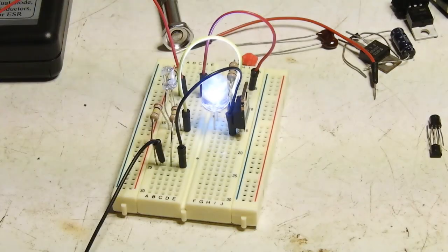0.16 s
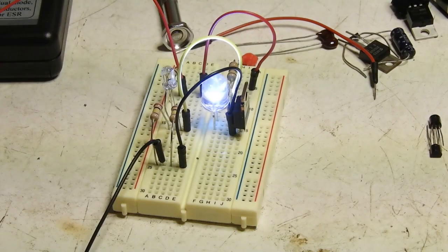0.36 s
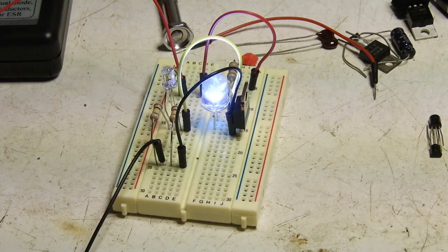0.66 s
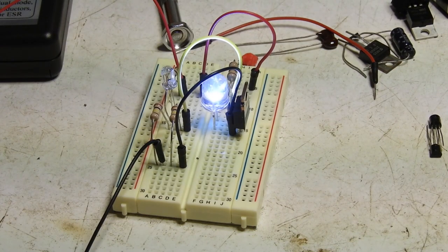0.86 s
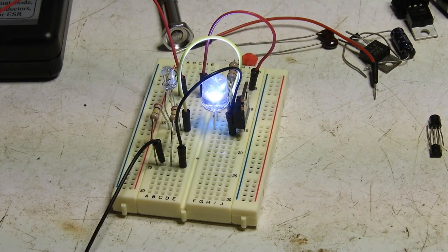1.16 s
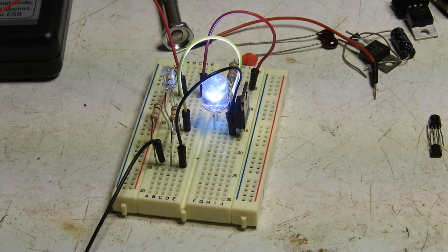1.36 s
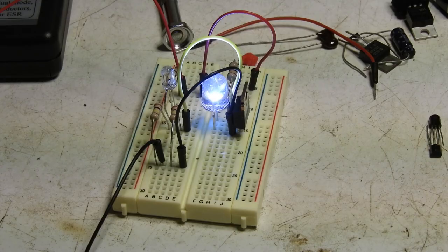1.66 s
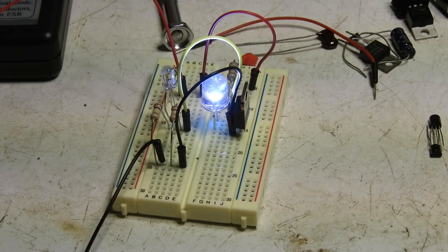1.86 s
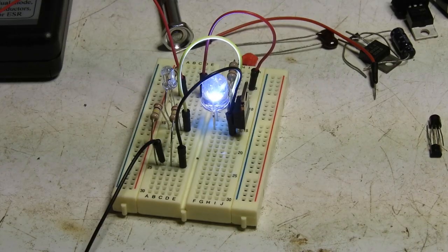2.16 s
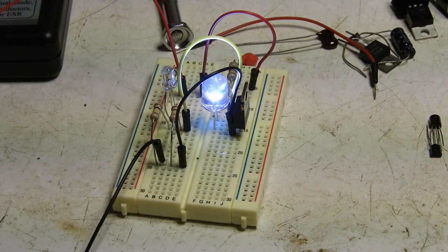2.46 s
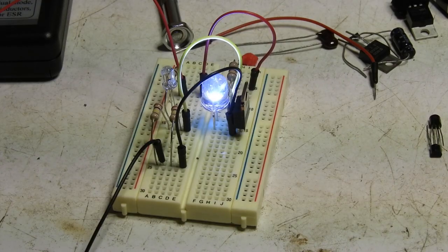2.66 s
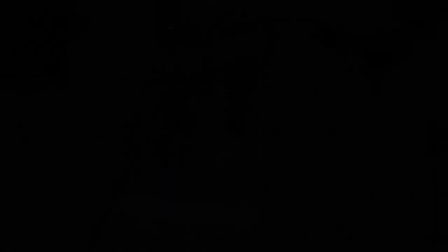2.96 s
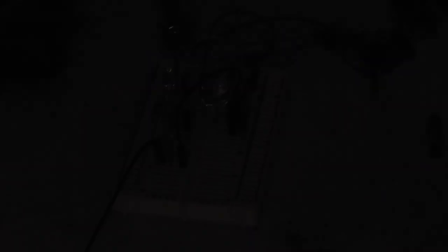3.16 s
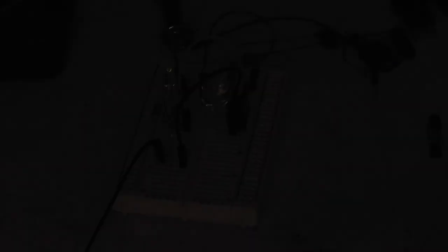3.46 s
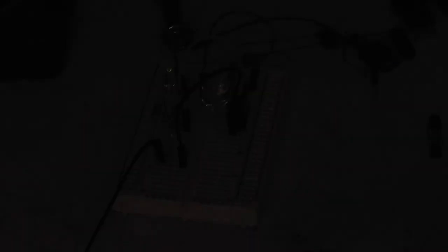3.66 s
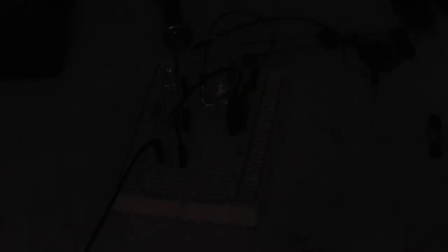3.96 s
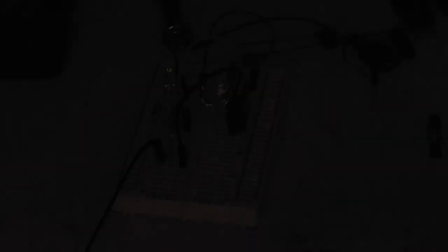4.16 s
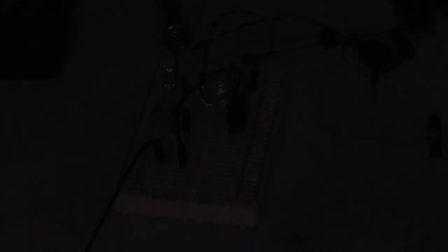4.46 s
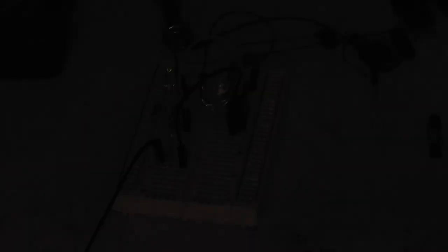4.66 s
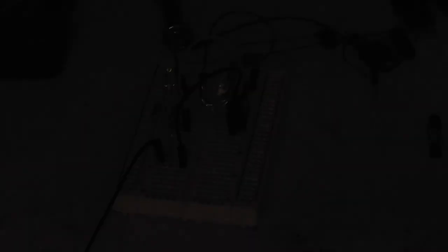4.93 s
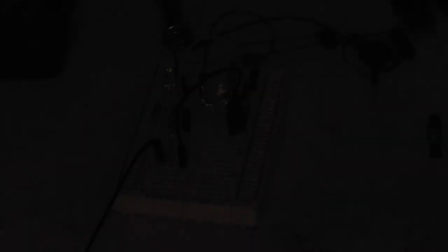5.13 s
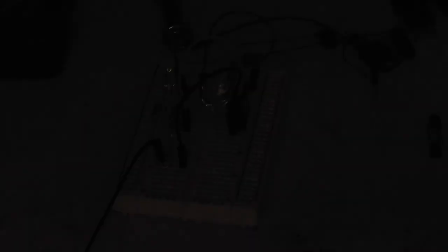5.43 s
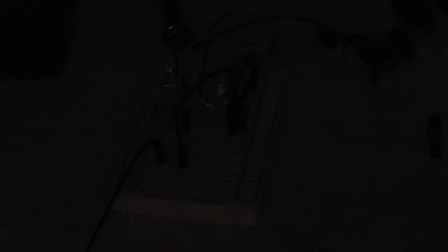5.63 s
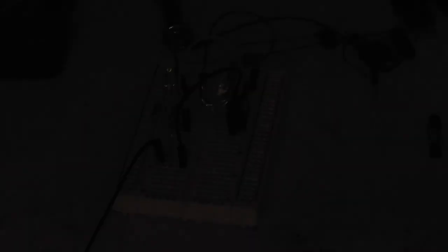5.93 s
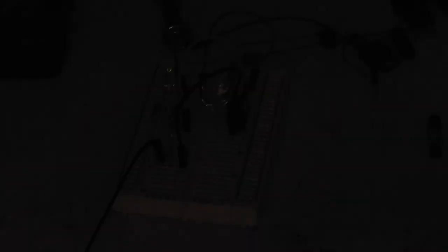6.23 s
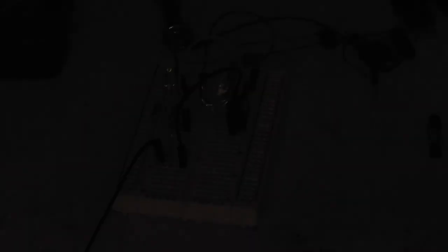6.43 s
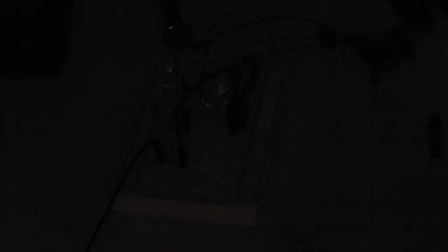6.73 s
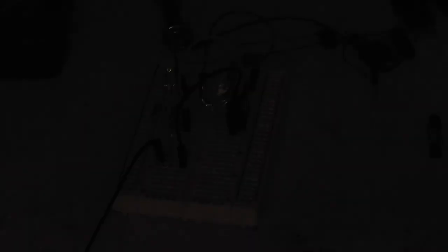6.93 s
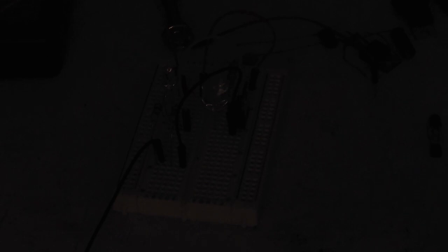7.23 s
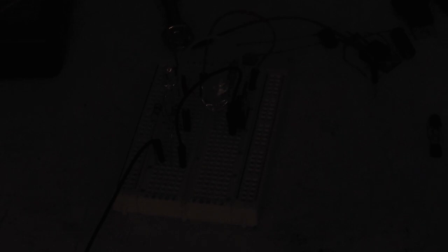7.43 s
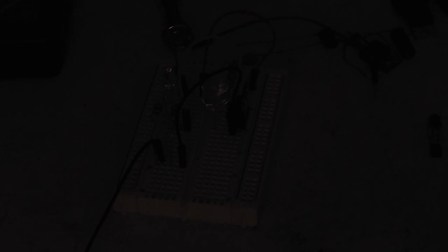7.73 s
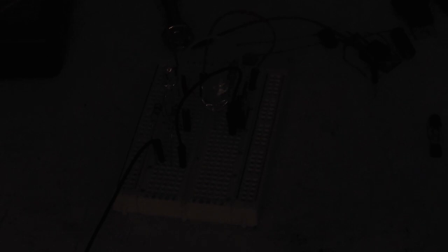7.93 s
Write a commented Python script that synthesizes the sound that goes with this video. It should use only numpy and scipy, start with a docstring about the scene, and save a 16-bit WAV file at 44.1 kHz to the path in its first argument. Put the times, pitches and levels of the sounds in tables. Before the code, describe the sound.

A low fan hum with a faint airy hiss fills a small workroom throughout. At the very start, the faint tail of a click dies away, and the hum swells up over the first second. At about 2.8 seconds a wall light switch ticks lightly under a finger, then snaps over just before 3 seconds with a loud, bright plastic click and a tiny rattle. Light ticks at about 4.5 seconds lead into a second sharp snap at 4.6. A soft low rush rises around 5.8 seconds, a faint tick follows at 6.1, and the third snap lands at about 6.3. Each snap sounds close, with a very short ring from the plate, spring and room. The hum drops after each one and swells back over a second or two, then continues alone until the end at about 8 seconds.

```python
"""A light switch and a fan

A fan hums in a small workroom while a wall switch is flipped three times; an earlier snap is
just dying away at the start. Each time, the lever ticks twice as it takes up its slack,
then snaps over and rings the plastic plate, the spring and the room. An automatic volume control
turns loud snaps down and lets the hum swell back over a second or two."""
import sys
import numpy as np
from scipy import signal
from scipy.fft import rfft, irfft, next_fast_len
from scipy.io import wavfile
from scipy.ndimage import uniform_filter1d

SR = 44100
rng = np.random.default_rng(int(sys.argv[2]) if len(sys.argv) > 2 else 0)


def generate_wav(signal):
    """Clip the signal to [-1, 1] and save it as 16-bit WAV at the path in sys.argv[1]."""
    frames = np.transpose(np.atleast_2d(signal))
    scaled = np.clip(frames, -1, 1) * 32767
    pcm = np.round(scaled).astype(np.int16)
    wavfile.write(sys.argv[1], SR, pcm)


N = 356945
TIME = np.arange(N) / SR
AGE = TIME[:SR // 2]  # seconds since a hit
ROOM_RISE_S, ROOM_FADE_S = 0.0018, 0.19  # every fade time here is the time to fall by 60 dB
LEFT_DELAY_S = .000027  # the switch reaches the left microphone this much later


def undb(db):
    """Turn decibels (dB) into a number to multiply by."""
    return 10 ** (np.asarray(db) / 20)


def unit(x):
    """Scale a sound to an average (rms) level of 1."""
    return x / np.sqrt(np.mean(np.abs(x) ** 2))


def curve(points, hz):
    """Read between (Hz, dB) points, with octaves evenly spaced."""
    point_hz, db = np.transpose(points)
    return np.interp(np.log(hz + 1), np.log(point_hz), db)


def pan(left_minus_right_db):
    """Share a sound between the left and right channels."""
    return undb(np.array([[1], [-1]]) * left_minus_right_db / 2)


def add(track, start, sound):
    """Mix a sound in at a time in seconds, dropping what falls outside the track."""
    i = int(start * SR)
    sound, i = sound[:, max(-i, 0):], max(i, 0)
    track[:, i:i + sound.shape[1]] += sound[:, :N - i]


# How wide noise sounds. Each row: frequency in Hz, dB of the channels' difference over their shared part.
STEREO_WIDTH = [(60, -14), (330, -10), (600, -11.5), (1800, -8), (3300, -2), (6000, -1.5), (10000, 0.5)]
def coloured(white, colour, balance, peaks=(), tilt_db=0, side_db=0, lag_s=0):
    """Shape two white noises into one stereo sound whose bass is nearly alike on both sides."""
    size = white.shape[1]
    hz = np.fft.rfftfreq(size, 1 / SR)
    octaves = np.log2(np.maximum(hz / 1000, 1))  # the treble tilt starts at 1000 Hz
    db = curve(colour, hz) + tilt_db * octaves
    for centre, width, lift_db in peaks:
        db = db + lift_db * np.exp(-2 * ((hz - centre) / width) ** 2)
    mid, side = rfft(white) * undb(db)
    side = side * undb(curve(STEREO_WIDTH, hz) + side_db)
    left = (mid + side) * np.exp(-2j * np.pi * hz * lag_s)
    return unit(irfft(np.array([left, mid - side]) * pan(curve(balance, hz)), size))


def standing_waves(x, spacing_hz=22, depth_db=3.0, above_hz=700, fade_hz=2800):
    """The room lifts some middle frequencies and hollows out their neighbours."""
    hz = np.fft.rfftfreq(N, 1 / SR)
    heights = rng.standard_normal(len(hz))
    reach = np.minimum(hz / above_hz, 1) / (1 + (hz / fade_hz) ** 2) ** .5
    ripple = np.interp(hz / spacing_hz, np.arange(len(hz)), heights) * reach
    return irfft(rfft(x) * undb(depth_db * ripple), N)


# The fan's rushing air and hiss. Each row: frequency in Hz, relative level in dB.
AIR_COLOUR = [(15, -26), (28, -4), (40, -14.5), (110, -6.5), (165, -6.5), (260, -15.5), (450, -9),
              (640, -19), (1000, -24), (1250, -25), (2600, -31), (5000, -32), (9500, -38.5), (12500, -44),
              (15000, -48.5)]
# Resonances the air stirs up, and dips between them. Each row: centre in Hz, width in Hz, lift in dB.
AIR_RESONANCES = [(57.4, 34, 7.5), (118, 35, 2.5), (377.3, 35, 13), (418, 20, -4), (522, 45, 6.5),
                  (550.4, 26, 6.5), (630, 30, 2), (682, 26, 6.5), (766, 34, 9), (885, 90, 7.5),
                  (992.7, 87, 9.5), (1443, 160, 4.5), (1671, 70, 8), (1870, 95, 7.5), (3150, 700, -0.5),
                  (4430, 130, 1.5)]
# Where the air is heard. Each row: frequency in Hz, left minus right in dB.
AIR_BALANCE = [(60, 2.5), (370, 3.5), (900, 2.5), (3000, 2), (10000, 0.9)]
# Motor and blade tones. Each row: pitch in Hz, level in dB, share that wavers,
# speed of wavering in Hz, left minus right in dB.
FAN_TONES = [(58.3, -50, 0.82, 5.4, 4), (120.5, -54, 0.42, 6.6, 3), (367.2, -42, 0.2, 3.3, 4.5)]
def fan(air_db=-40.5):
    """Air rushes steadily under the wavering tones of the motor and blades."""
    air = standing_waves(coloured(rng.standard_normal((2, N)), AIR_COLOUR, AIR_BALANCE, AIR_RESONANCES))
    hum = 0
    for hz, db, share, rate_hz, pan_db in FAN_TONES:
        phase = 2 * np.pi * (hz * TIME + rng.random())
        tone = np.real((1 + share * waver(rate_hz)) * np.exp(1j * phase))
        hum = hum + undb(db) * unit(tone) * pan(pan_db)
    return hum + undb(air_db) * air


def waver(rate_hz):
    """A slow random drift in a tone's strength and phase."""
    size = next_fast_len(N)
    hz = np.fft.fftfreq(size, 1 / SR)
    noise = rng.standard_normal(size) + 1j * rng.standard_normal(size)
    return unit(np.fft.ifft(noise / (1 + (hz / rate_hz) ** 2))[:N])


# The rise and fall of a low rush. Each row: time in seconds, level in dB.
RUSH_LEVELS = [(5.68, -75), (5.8, -48.5), (6.2, -51), (6.3, -72.5)]
# Its tone. Each row: frequency in Hz, relative level in dB.
RUSH_TONE = [(20, -23), (100, -8), (220, -4.5), (350, -15.5), (470, 1.5), (560, 9.5), (660, -23.5),
             (1500, -22), (5000, -51.5)]
def low_rush():
    """A soft low rush swells before the last flip and fades as it snaps."""
    times, db = np.transpose(RUSH_LEVELS)
    envelope = np.interp(TIME, times, undb(db), left=0, right=0)
    return envelope * coloured(rng.standard_normal((2, N)), RUSH_TONE, AIR_BALANCE)


def swell(rise_s, fade_s):
    """Loudness after a hit: a quick rise, then a smooth fade."""
    return (1 - np.exp(-AGE / rise_s)) * np.exp(-np.log(1000) * AGE / fade_s)


# Where the switch is heard. Each row: frequency in Hz, left minus right in dB.
SWITCH_BALANCE = [(900, -1.5), (1600, -3), (2700, -5), (4000, -0.5), (5500, 0), (8500, 4), (12000, -1.5)]
def contact(colour, rise_s, fade_s, room_db, tilt_db=0):
    """Plastic hits plastic: a burst of noise and its reflections from the walls."""
    envelope = np.hypot(swell(rise_s, fade_s), undb(room_db) * swell(ROOM_RISE_S, ROOM_FADE_S))
    noise = rng.standard_normal((2, len(AGE))) * envelope
    burst = coloured(noise, colour, SWITCH_BALANCE, tilt_db=tilt_db, side_db=-5.5, lag_s=LEFT_DELAY_S)
    fade_out = np.minimum(2 - 2 * AGE / AGE[-1], 1)
    return burst * fade_out * np.sqrt(np.mean(envelope ** 2))


def ringing(notes, blur_hz, room_db, rise_s=0.0041, room_side_db=-2):
    """A struck part rings at its own notes, and the room holds a blurred trace of each."""
    out = 0
    bins = np.fft.rfftfreq(len(AGE), 1 / SR)
    for hz, fade_s, db in notes:
        phase = 2 * np.pi * (rng.random() + hz * (AGE - np.array([[LEFT_DELAY_S], [0]])))
        ring = np.sin(phase) * swell(rise_s, fade_s) * pan(curve(SWITCH_BALANCE, hz))
        band = np.exp(-((bins - hz) / blur_hz) ** 2)
        mid, side = irfft(rfft(rng.standard_normal((2, len(AGE)))) * band, len(AGE))
        blur = unit(mid + undb(room_side_db) * side * np.array([[1], [-1]]))
        out = out + undb(db) * (ring + undb(room_db) * blur * swell(ROOM_RISE_S, ROOM_FADE_S))
    return out


# The plate's notes. Each row: pitch in Hz, fade in seconds, level in dB for each of the three flips.
PLATE_NOTES = [(828, 0.068, -17, -21, -23), (1026, 0.047, -11.5, -24.5, -18), (1218, 0.31, -28, -21, -25.5),
               (1324, 0.042, -8.5, -14, -3.5), (1622, .05, -5, -7.5, -19.5), (1927, 0.05, -23.5, -4.5, -23),
               (2193, 0.05, -12.5, -4.5, 1), (2330, 0.078, -12, -1.5, -22.5), (2455, .045, -3, -10.5, -19),
               (2620, 0.021, 1, -11, -14.5), (2780, .05, -16, -7, -23), (2960, 0.1, -17.5, -15, -6.5),
               (3440, 0.052, -4.5, -2, -1), (3740, .04, -11.5, -3, 2)]
def plate(flip):
    """The plastic plate rings; each flip (0, 1 or 2) strikes its notes differently."""
    notes = [(hz, fade_s, levels[flip]) for hz, fade_s, *levels in PLATE_NOTES]
    return ringing(notes, blur_hz=260, room_db=-13.5)


# The spring's notes. Each row: pitch in Hz, fade in seconds, relative level in dB.
SPRING_NOTES = [(4317, .08, -6), (4802, .09, -3.5), (5782, .09, -2), (6745, .08, 0), (7311, .08, 1.5),
                (7574, .08, 2), (7773, .08, 1), (8400, .075, 2), (8549, .07, 2), (8780, .07, 4),
                (8987, .07, 2.5), (9235, .075, 2), (9495, .07, 3), (9771, .085, 1.5)]
def spring(db=-0.5):
    """The spring and contacts ring high, with the same notes in every snap."""
    return undb(db) * ringing(SPRING_NOTES, blur_hz=110, room_db=-15)


# The tone of a tick. Each row: frequency in Hz, relative level in dB.
TICK_COLOUR = [(20, -65.5), (500, -31), (1300, -8), (2300, 2), (3600, 3), (5200, 6.5), (7000, 3),
               (9400, 0.5), (10800, -21), (15000, -40.5)]
def tick(db, tilt_db):
    """A light tick, made brighter or duller by its treble tilt."""
    return undb(db) * contact(TICK_COLOUR, rise_s=.0008, fade_s=0.076, room_db=-9.5, tilt_db=tilt_db)


# Stray touches and rattles. Each row: start in seconds, level in dB, treble tilt in dB per octave.
TOUCHES = [(0.509, -46, -19), (0.672, -40, 35.5), (.855, -47, -6), (2.367, -44.5, -2.5), (2.9959, -13, 6),
           (4.602, -9, -1.5), (5.86, -37, -5.5)]
def stray_touches():
    """The lever ticks when it is brushed or rattles."""
    out = np.zeros((2, N))
    for start, db, tilt_db in TOUCHES:
        add(out, start, tick(db, tilt_db))
    return out


# Finger presses. Each row: start in seconds, level in dB, treble tilt in dB per octave,
# seconds until the lever settles, then that second tick's level and tilt.
FINGER_PRESSES = [(2.815, -23.5, 0, 0.062, -35.5, 4), (4.4741, -21.5, 11.5, 0.064, -32.5, 7.5),
                  (6.0999, -31, -1.5, .098, -43, 28)]
def presses(ring_db=-15.5):
    """A finger takes up the lever's slack: a tick that lightly rings the plate, then a softer tick."""
    out = np.zeros((2, N))
    for flip, (start, db, tilt_db, settle_s, settle_db, settle_tilt_db) in enumerate(FINGER_PRESSES):
        add(out, start, tick(db, tilt_db) + undb(db + ring_db) * plate(flip))
        add(out, start + settle_s, tick(settle_db, settle_tilt_db))
    return out


# The first instant of a snap. Each row: frequency in Hz, relative level in dB.
STRIKE_COLOUR = [(20, -70.5), (600, -43), (1400, -30), (3800, -22), (4700, -2.5), (9500, 3.5),
                 (11000, -13.5), (15500, -22.5)]
# The crack that follows. Each row: frequency in Hz, relative level in dB.
CRACK_COLOUR = [(20, -67.5), (500, -47.5), (1300, -39), (2500, -24.5), (3900, -20.5), (4700, -8),
                (6200, -8), (7500, 0), (9650, -1.5), (10350, -15), (11300, -19.5), (12200, -33),
                (16000, -48)]
# The snaps. Each row: start in seconds, levels of strike, crack and ring in dB,
# then the crack's fade in seconds, room echo in dB and treble tilt in dB per octave.
LEVER_SNAPS = [(-.055, -6, -3, -16, .06, -10, -9), (2.9405, 15, 14.5, -8.5, 0.045, -17.5, 4.5),
               (4.593, 5.5, 3.5, -8, 0.073, -14.5, -1.5), (6.2684, 11, 9, -12, 0.045, -15.5, 1)]
def snaps(faint_tick_lead_s=0.0097):
    """The lever snaps over, ringing the plate and spring; a faint dull tick comes just before."""
    out = np.zeros((2, N))
    flips = (2, 0, 1, 2)  # the snap dying away at the start rings like the last one
    for flip, (start, strike_db, crack_db, ring_db, fade_s, room_db, tilt_db) in zip(flips, LEVER_SNAPS):
        strike = contact(STRIKE_COLOUR, rise_s=.0002, fade_s=0.0038, room_db=-42)
        crack = contact(CRACK_COLOUR, rise_s=0.0018, fade_s=fade_s, room_db=room_db, tilt_db=tilt_db)
        ring = plate(flip) + spring()
        add(out, start - faint_tick_lead_s, tick(db=-36.5, tilt_db=-11.5))
        add(out, start, undb(strike_db) * strike + undb(crack_db) * crack + undb(ring_db) * ring)
    return out


def scene():
    """The switch over the fan."""
    return fan() + snaps() + presses() + stray_touches() + low_rush()


def early_lows(x, split_hz=3990, lead_s=.0098):
    """The lower part of the sound comes through a little ahead of the treble."""
    size = next_fast_len(N)
    hz = np.fft.rfftfreq(size, 1 / SR)
    low = irfft(rfft(x, size) / (1 + (hz / split_hz) ** 200), size)[:, :N]
    lead = int(lead_s * SR)
    return x - low + np.pad(low[:, lead:], ((0, 0), (0, lead)), mode="reflect")


def volume_control(x, limit_db=-10.5, recovery_db_per_s=8.5, start_cut_db=10,
                   attack_s=0.0005, window_s=0.0019):
    """Turn the volume down quickly by however far it passes the limit, then steadily back up."""
    power = uniform_filter1d(np.mean(x ** 2, axis=0), int(window_s * SR))
    excess_db = np.maximum(10 * np.log10(np.maximum(power, 1e-12)) - limit_db, 0)
    climb_db = recovery_db_per_s * TIME
    cut_db = np.maximum(np.maximum.accumulate(excess_db + climb_db), start_cut_db) - climb_db
    smoothing = np.exp(-1 / (attack_s * SR))
    cut_db = start_cut_db + signal.lfilter([1 - smoothing], [1, -smoothing], cut_db - start_cut_db)
    return x * undb(-cut_db)


def hiss_suppressor(x, corner_hz=7450, faint_db=-69, cut_per_db=0.61, window_s=.03):
    """Turn the treble down further whenever it is very faint."""
    size = next_fast_len(N)
    hz = np.fft.rfftfreq(size, 1 / SR)
    treble = irfft(rfft(x, size) * hz ** 2 / (hz ** 2 + corner_hz ** 2), size)[:, :N]
    power = uniform_filter1d(np.mean(treble ** 2, axis=0), int(window_s * SR))
    under_db = np.minimum(10 * np.log10(np.maximum(power, 1e-12)) - faint_db, 0)
    return x - treble * (1 - undb(cut_per_db * under_db))


def record(dry):
    """Move the lows ahead, control volume and hiss, flatten the hardest peaks, cut above 15700 Hz."""
    levelled = volume_control(early_lows(dry))
    clipped = np.clip(hiss_suppressor(levelled), -1, 1)
    return signal.sosfilt(signal.ellip(8, .2, 70, 15700, fs=SR, output="sos"), clipped)


dry = scene()
out = record(dry)
generate_wav(out)
```